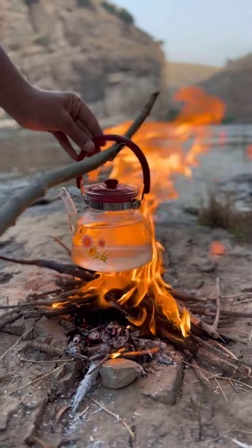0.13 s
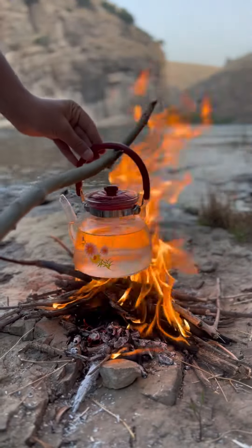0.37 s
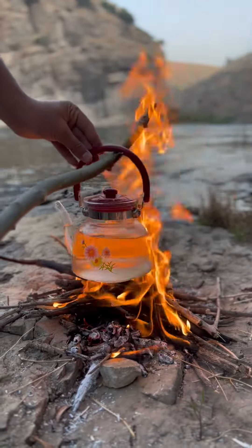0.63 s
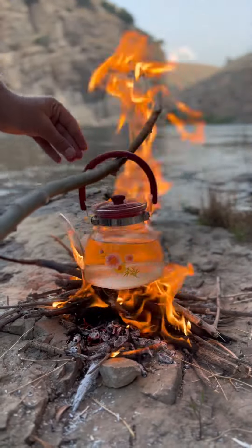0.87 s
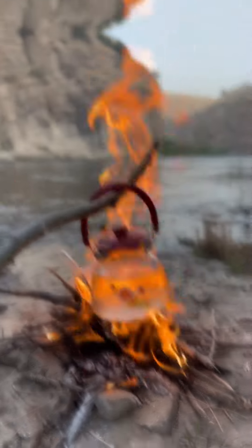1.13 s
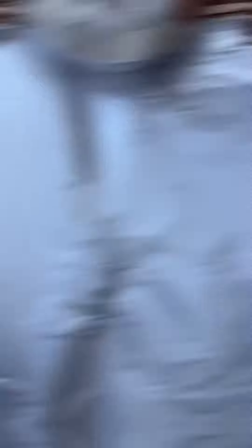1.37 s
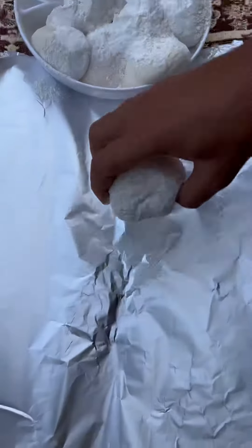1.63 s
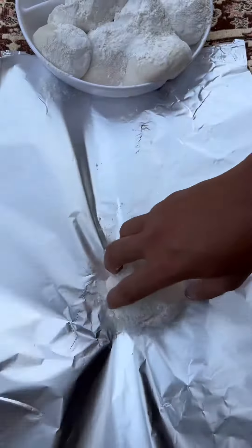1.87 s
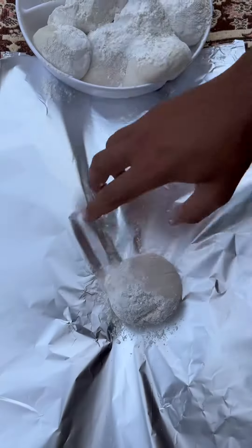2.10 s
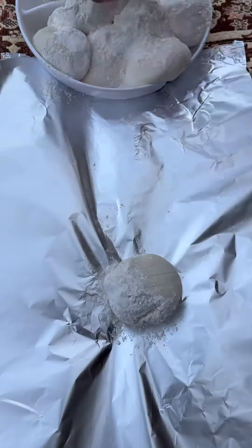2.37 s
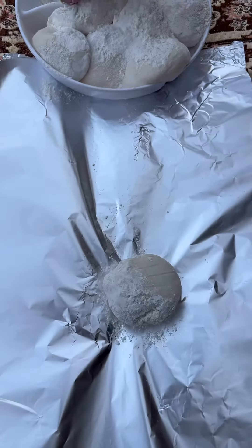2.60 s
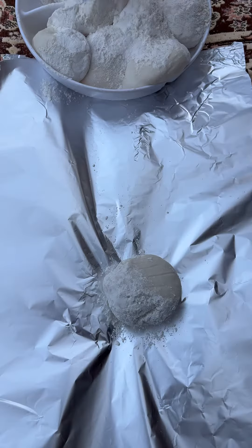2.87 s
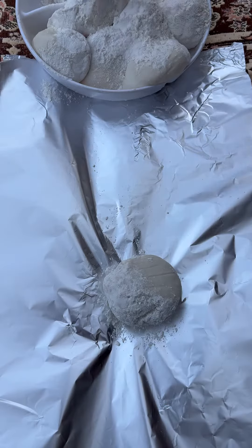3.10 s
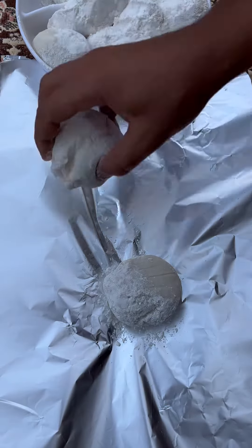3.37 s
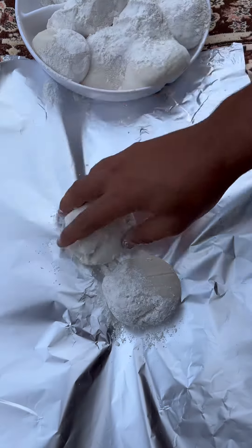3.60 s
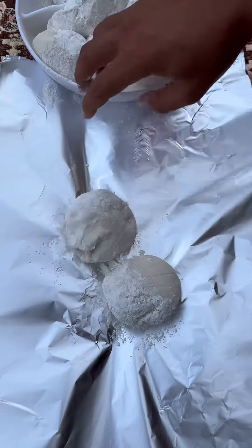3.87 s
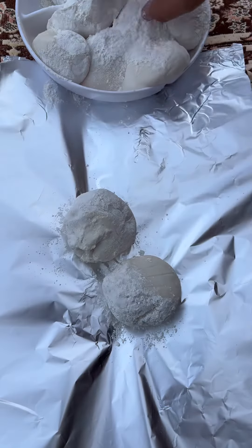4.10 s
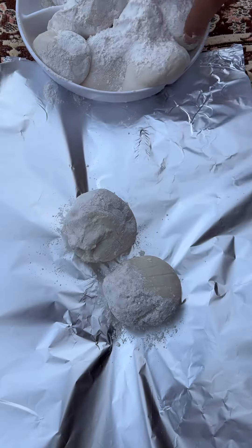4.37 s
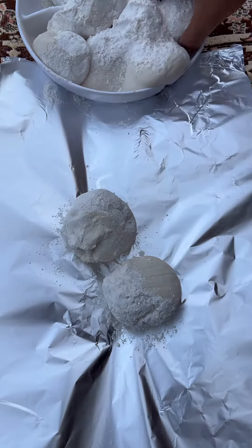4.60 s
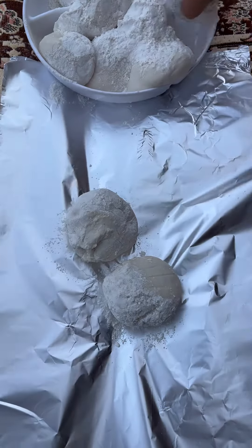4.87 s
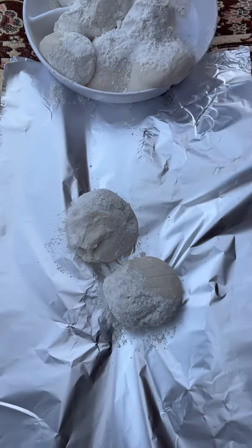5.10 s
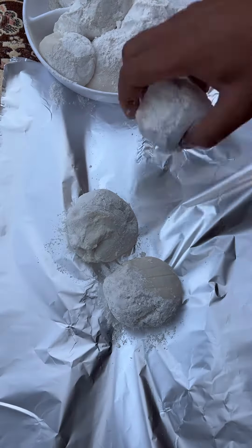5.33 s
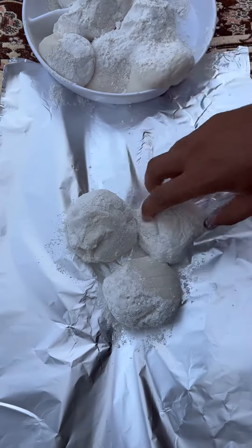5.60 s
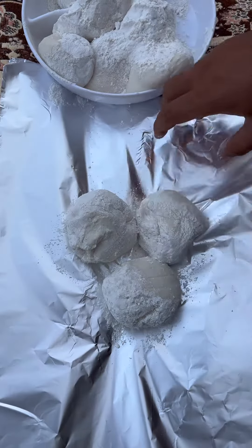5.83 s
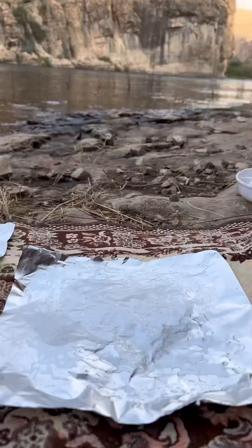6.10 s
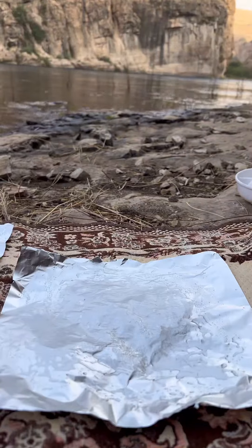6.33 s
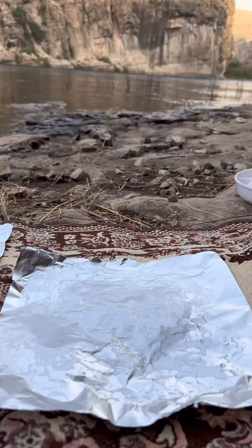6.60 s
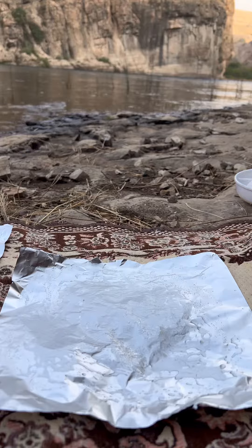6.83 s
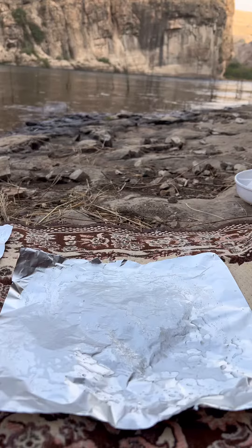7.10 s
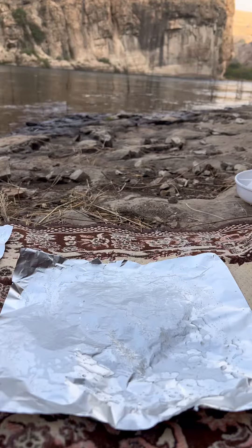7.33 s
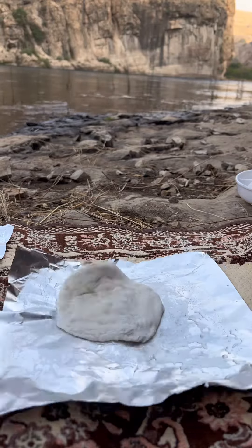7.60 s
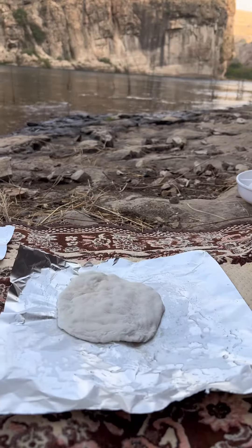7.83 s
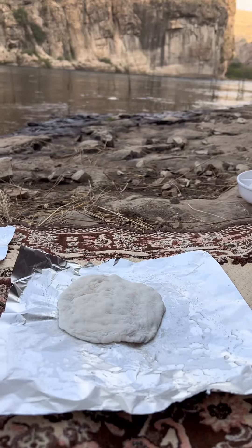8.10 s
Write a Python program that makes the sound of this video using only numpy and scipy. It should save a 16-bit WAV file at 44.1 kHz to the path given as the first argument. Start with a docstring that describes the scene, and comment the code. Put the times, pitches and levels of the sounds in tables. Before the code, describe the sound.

Outdoor river roar and fluttering flames with tiny pops, cutting to sharp foil crinkles under three dough balls and one final crisp foil crash.

```python
"""Outdoors by a river, three shots cut together: a twig fire, then balls of dough set down on a sheet of
aluminium foil, then a flat loaf dropped on the foil. The far river and air make a dull steady roar of
coloured noise; the fire adds rumble, noise hiss, and filtered clicks as ticks, sap pops and fizz.
Foil crashes and crinkles at each touch: showers of tiny snaps, ringing in the thin sheet. Each landing
adds a push of air, a thud and ringing panels. All is heard through two microphone ports."""
import sys
import numpy as np
from scipy import signal
from scipy.fft import rfft, irfft, next_fast_len
from scipy.io import wavfile

SR = 44100
rng = np.random.default_rng(int(sys.argv[2]) if len(sys.argv) > 2 else 0)


def int16_out(signal):
    """Quantize to a 16-bit WAV file."""
    q = np.round(np.clip(np.atleast_2d(signal).T, -1, 1) * 32767)
    wavfile.write(sys.argv[1], SR, q.astype(np.int16))


def voltage_ratio(decibels):
    """Convert decibels (scalar or array-like) to amplitude ratios, 20 dB per decade."""
    exponent = np.asarray(decibels, float) / 20
    return 10 ** exponent


N = 362061   # length in samples
STEP = 16   # samples per envelope point

# The three shots, with a short gap before the last: start_s, end_s
SHOT_TIMES = [(-1, 1.8122), (1.8122, 6.0972), (6.107, 9)]
# Width between the microphone ports, one table a shot: pitch_hz, difference_over_sum_db
PORT_WIDTH = [
    [(60, -27), (110, -32), (200, -21.5), (380, -22), (700, -4.5), (1290, -5.5), (2380, -5), (4400, -3),
     (8120, -1.5), (15000, 1)],
    [(60, -18), (110, -21.5), (200, -24.5), (380, -13), (700, -2), (1290, -3.5), (2380, -0.5), (4400, -1.5),
     (8120, -3), (15000, 0.5)],
    [(60, -19), (110, -28.5), (200, -16.5), (380, -13.5), (700, -1.5), (1290, -5), (2380, -3.5), (4400, -4),
     (8120, -9), (15000, -2)],
]
# Balance of the ports, one table a shot: pitch_hz, left_over_right_db
PORT_BALANCE = [
    [(60, 0.5), (180, 1.0), (550, 3), (1650, 1.5), (4970, 0.5), (15000, 0.0)],
    [(60, 1.0), (180, 1.5), (550, 2.0), (1650, 1.0), (4970, 1.0), (15000, 0.2)],
    [(60, -1.0), (180, -1.95), (550, -2.4), (1650, 1.6), (4970, -1.7), (15000, 0.0)],
]


def at_hz(points, hz):
    """Read a table on a log-frequency axis."""
    points = np.array(points)
    return np.interp(np.log(hz), np.log(points[:, 0]), points[:, 1])


def rms_one(x):
    """Scale to rms 1."""
    return x / np.sqrt(np.mean(x ** 2) + 1e-20)


def full_rate(coarse):
    """Join envelope points up to one value a sample."""
    return np.interp(np.arange(N) / STEP, np.arange(len(coarse)), coarse)


def drift(rate_hz):
    """Slow chance with rms 1: noise through two equal low-pass poles."""
    r = np.exp(-2 * np.pi * rate_hz * STEP / SR)
    noise = rng.standard_normal(N // STEP + 4002)
    slow = signal.lfilter([1], [1, -2 * r, r * r], noise)[4000:]   # the filter has settled
    return full_rate(rms_one(slow))


def two_ports(shared, own, side_db, balance_db, lagging, colour=None):
    """The ports differ by a part that is the same sound lagging on the left, and a part unrelated to it."""
    size = next_fast_len(N)
    hz = np.maximum(np.arange(size // 2 + 1) * SR / size, 1)
    gain = 1 if colour is None else voltage_ratio(at_hz(colour, hz))
    width = voltage_ratio(at_hz(side_db, hz))
    lagging = np.clip(lagging, 0, 1)
    mid = rfft(shared, size) * gain
    unrelated = np.sqrt(1 - lagging ** 2) * rfft(own, size) * gain
    late = -1j * lagging * mid   # a quarter cycle behind
    side = width * (unrelated + late)
    lean = voltage_ratio(at_hz(balance_db, hz) / 2)
    left = irfft((mid + side) * lean, size)[:N]
    right = irfft((mid - side) / lean, size)[:N]
    return np.array([left, right])


def ring(clicks, hz, t60_s):
    """A two-pole resonator: a unit click sets a dying sine of height 1 ringing."""
    r, w = voltage_ratio(-60 / (t60_s * SR)), 2 * np.pi * hz / SR
    return signal.lfilter([0, np.sin(w)], [1, -2 * r * np.cos(w), r * r], clicks + 1e-18)


def roar():
    """Smooth noise with the colour of each shot; bass and treble waver, most of all near the flames."""
    # Spectrum of the roar by the fire, near the foil and by the river: pitch_hz, level_db_per_hz
    fire_colour = [(15, -43), (25, -18.5), (42, -6.5), (59, -2), (180, -4), (394, -6.5), (427, -7),
                   (840, -17.5), (936, -22), (2050, -31), (3500, -40.5), (5000, -48), (8140, -46.5),
                   (12200, -65), (16000, -53.5)]
    near_foil_colour = [(15, -72.5), (25, -39.5), (63, -12), (134, -3), (243, -7), (291, -4.5), (475, -9),
                        (513, -12), (600, -13), (756, -15.5), (883, -20.5), (1500, -31.5), (2820, -36.5),
                        (5120, -47), (5820, -50), (12000, -68.5), (15600, -97), (22000, -120)]
    river_colour = [(15, -40), (25, -33), (47, -15), (145, -2), (277, -5.5), (309, -6.5), (344, -4),
                    (405, -2), (911, -16), (1230, -20), (2280, -28.5), (5280, -45.5), (6740, -57.5),
                    (16000, -69)]
    # Level in each shot before the wavering: start_db, end_db
    shot_levels = [(-42, -37.5), (-43.5, -42.5), (-40, -40.5)]
    flutter_db, flutter_below_hz = [2.5, .6, .6], 200   # rms swing of the bass, per shot
    flicker_db, flicker_above_hz = [1.5, .8, .8], 2000   # rms swing of the treble, per shot
    fade_s = .003   # each shot's roar fades in and is cut off hard
    lagging = 0.43
    bass_band = signal.butter(2, flutter_below_hz, fs=SR, output="sos")
    treble_band = signal.butter(2, flicker_above_hz, "high", fs=SR, output="sos")
    t, out = np.arange(N) / SR, np.zeros((2, N))
    for k, colour in enumerate([fire_colour, near_foil_colour, river_colour]):
        noise = rng.standard_normal((2, N))
        pair = rms_one(two_ports(*noise, PORT_WIDTH[k], PORT_BALANCE[k], lagging, colour))
        bass = signal.sosfiltfilt(bass_band, pair)
        treble = signal.sosfiltfilt(treble_band, pair)
        pair = pair + bass * (voltage_ratio(flutter_db[k] * drift(3.6)) - 1)
        pair = pair + treble * (voltage_ratio(flicker_db[k] * drift(14.0)) - 1)
        start_s, end_s = SHOT_TIMES[k]
        shown = np.clip((t - start_s) / fade_s, 0, 1) * (t < end_s)
        out += shown * voltage_ratio(np.interp(t, SHOT_TIMES[k], shot_levels[k])) * pair
    return out


def fizz():
    """Faint crackle of the embers: sparse tiny clicks of uneven size while the fire is near."""
    clicks_per_s, least_db = 30., -54   # click size ahead of the band-pass
    size_db = least_db + 3.3 * np.minimum(rng.exponential(1, N), 3)
    sizes = voltage_ratio(size_db) * rng.choice([-1, 1], N)
    near_fire = np.arange(N) / SR < SHOT_TIMES[0][1]
    born = (rng.random(N) < clicks_per_s / SR) * near_fire
    band = signal.butter(2, [4800, 12000], "band", fs=SR, output="sos")
    return signal.sosfilt(band, sizes * born + 1e-18)


def pops():
    """Each sap pop in the twigs is a short pitched ring, struck by a very short pulse."""
    # Sap pops: start_s, nominal peak_db, pitch_hz
    sap_pops = [(0.0667, -53, 2160), (0.4419, -47.5, 2650), (1.2461, -54.5, 1930), (1.3468, -47.5, 2290)]
    out = np.zeros(N)
    for s, db, hz in sap_pops:
        click = np.zeros(round(.05 * SR))
        click[:6] = voltage_ratio(db) / 4
        at = round(s * SR)
        out[at:at + len(click)] += ring(click, hz, t60_s=0.02)
    return out


def ticks():
    """Each twig tick is a click ringing for a few cycles: a dying noise burst in a band around its pitch."""
    # Twig ticks: start_s, peak_db (ahead of the two ports), pitch_hz
    twig_ticks = [(0.4823, -45, 9500), (0.5665, -53, 10100), (0.73, -51, 9390), (0.8131, -51, 8400),
                  (0.8345, -53, 8000), (0.9288, -54, 9000), (0.9498, -45.5, 6300), (0.9857, -52, 9500),
                  (1.1, -43, 8600), (1.2246, -49, 8230), (1.3867, -59, 11000)]
    out, t = np.zeros(N), np.arange(round(.02 * SR)) / SR
    noises = rng.standard_normal((len(twig_ticks), len(t)))
    for (s, db, hz), noise in zip(twig_ticks, noises):
        burst = noise * voltage_ratio(-60 * t / 0.013)   # t60 13 ms
        band_hz = [hz / 1.36, min(hz * 1.18, .45 * SR)]
        burst = signal.lfilter(*signal.butter(2, band_hz, "band", fs=SR), burst)
        at = round(s * SR)
        out[at:at + len(t)] += voltage_ratio(db) * burst / np.abs(burst).max()
    return out


def snaps():
    """Tiny creases snapping through: two unrelated streams of clicks at random times, sizes and signs."""
    snaps_per_s, spread_db = 9000., 3
    size_db = spread_db * np.minimum(rng.exponential(1, (2, N)), 4)
    sizes = voltage_ratio(size_db) * rng.choice([-1, 1], (2, N))
    return rms_one(sizes * (rng.random((2, N)) < snaps_per_s / SR))


def crackle_power(centres):
    """Power of the crackle per band over time, and its left-right dB: crushes, buckles and stirs added up."""
    # How hard the foil is crushed, one curve for each touch: time_s, crackle_db
    crush_curves = [
        [(1.49, -72), (1.55, -61), (1.65, -60), (1.7, -55.5), (1.82, -57)],
        [(1.826, -42), (1.831, -25.5), (1.838, -17), (1.872, -19.5), (1.906, -30), (1.972, -34.5), (2.002, -45),
         (2.044, -47), (2.1, -58)],
        [(3.4655, -29.5), (3.471, -22.5), (3.477, -16.5), (3.497, -26), (3.524, -25), (3.565, -35),
         (3.585, -34), (3.62, -45)],
        [(3.622, -33), (3.635, -32.5), (3.649, -33), (3.677, -48), (3.76, -75)],
        [(4.643, -57), (4.65, -36), (4.704, -41.5), (4.734, -28.5), (4.784, -36), (4.808, -27.5), (4.868, -44),
         (4.94, -46), (5.0, -63)],
        [(5.39, -67), (5.408, -54), (5.414, -39.5), (5.437, -39.5)],
        [(5.4375, -21), (5.446, -22), (5.456, -25), (5.51, -29), (5.546, -45.5), (5.6, -54), (5.64, -52)],
        [(7.542, -17), (7.562, -15.5), (7.596, -33), (7.618, -29), (7.66, -39), (7.71, -59)],
    ]
    # For those touches: brightness_db_per_octave, left_over_right_db
    touch_tones = [(-1, 0), (2.5, 0), (1.5, -0.5), (4.5, 0), (3, 0), (-0.5, 0), (3, -0.5), (2.5, -1)]
    # Single creases flip over: start_s, nominal peak_db, t60_s (at 5 kHz), brightness_db_per_octave
    buckles = [(1.536, -53, .1, -7), (1.551, -46.5, 0.077, -1), (1.581, -25, 0.054, -1.5),
               (1.663, -27, .11, 1), (1.715, -39, 0.04, 1), (1.797, -36, 0.069, -10), (1.955, -26, 0.11, 4),
               (2.033, -34.5, 0.18, -2.5), (2.1054, -33, 0.029, -7.5), (2.127, -63.5, 0.082, 15),
               (2.5258, -45, .05, -6), (3.4177, -32.5, 0.038, -2.5), (3.642, -29.5, 0.071, 1.5),
               (3.979, -53, .03, -7), (4.712, -31, 0.086, 1.5), (4.913, -35, 0.14, -2),
               (5.008, -35.5, 0.095, 0), (5.116, -59, .03, -1), (5.182, -56, .03, 6),
               (5.436, -9, 0.096, -2.5), (5.561, -32.5, 0.103, -4), (5.587, -27, .05, 0.5),
               (5.604, -31.5, 0.1, 2), (5.647, -27, 0.065, 1.5), (5.806, -42.5, 0.053, -0.5),
               (6.004, -49, 0.068, -7), (7.315, -58.5, .03, 0), (7.435, -60, .03, 4),
               (7.716, -40.5, .05, 4.5), (7.838, -52.5, .04, 6), (7.931, -41, .045, -1.5)]
    # The loose sheet stirs faintly: middle_s, level_db, half_length_s, brightness_db_per_octave
    stirs = [(2.534, -81, 0.054, -3), (2.773, -73, 0.074, -4), (4.126, -70, 0.036, 2.5),
             (4.33, -71, 0.041, -8.5), (4.52, -75, 0.052, -7.5), (3.44, -56.5, .02, -3),
             (5.69, -74, 0.027, -14), (6.572, -78, 0.037, 0.5), (7.26, -70.5, 0.031, -5),
             (7.774, -71.5, 0.062, -3)]
    body_below_hz = 1700   # below this the whole sheet moves and brightness changes nothing more
    dulls_per_db, firm_db = 0.0945, -24.5   # dB per octave lost for each dB under a firm crush
    crest_db = 9   # peaks of a crinkle above its rms
    attack_s = 0.00036
    treble_damping = 0.11   # t60 shrinks as this power of pitch
    after_db, after_t60_s = -17.5, .3   # the sheet settles after each buckle

    t = np.arange(N // STEP + 2) * STEP / SR
    octaves = np.log2(np.maximum(centres, body_below_hz) / 5000)[:, None]
    power, pan_db = np.zeros((len(centres), len(t))), np.zeros(len(t))
    for curve, (tilt_db, lean_db) in zip(crush_curves, touch_tones):
        s, db = np.transpose(curve)
        on = (t >= s[0]) & (t < s[-1])
        level_db = np.interp(t[on], s, db)
        brightness_db = tilt_db + dulls_per_db * (level_db - firm_db)
        power[:, on] += voltage_ratio(level_db + octaves * brightness_db) ** 2
        pan_db[t >= s[0]] = lean_db
    damping = (centres[:, None] / 5000) ** treble_damping
    for s, db, t60, tilt_db in buckles:
        on = (t >= s) & (t < s + .5)
        age = t[on] - s
        flip = voltage_ratio(-120 * age * damping / max(t60, .01))   # 120, as this is power
        settling = voltage_ratio(2 * after_db - 120 * age * damping / after_t60_s)
        attack = voltage_ratio(db - crest_db + tilt_db * octaves) * (1 - np.exp(-age / attack_s))
        power[:, on] += attack ** 2 * (flip + settling)
    for s, db, half_s, tilt_db in stirs:
        swell = np.exp(-((t - s) / half_s) ** 2)
        power += voltage_ratio(db + tilt_db * octaves) ** 2 * swell
    return power, pan_db


def sheet(x):
    """Each snap rings on in many close modes (a click, then dying noise) that change as the sheet bends."""
    shape_lasts = 1024   # samples until the sheet has taken a new shape
    tail_db, t60_s = -9.5, 0.022   # tail energy relative to the click
    count = N // shape_lasts + 1
    t = np.arange(shape_lasts) / SR
    tails = rng.standard_normal((count, shape_lasts)) * voltage_ratio(-60 * t / t60_s)
    replies = voltage_ratio(tail_db) * tails / np.sqrt(np.sum(tails ** 2, axis=1, keepdims=True))
    replies[:, 0] = 1   # the click itself
    blocks = np.pad(x, ((0, 0), (0, count * shape_lasts - N))).reshape(2, count, -1)
    rung = irfft(rfft(blocks, 2 * shape_lasts) * rfft(replies, 2 * shape_lasts))
    heads = rung[:, :, :shape_lasts]
    ends = np.roll(rung[:, :, shape_lasts:], 1, axis=1)   # ring over into the next block
    return (heads + ends).reshape(2, -1)[:, :N] / np.hypot(1, voltage_ratio(tail_db))


def foil(patchy_db, surge_db):
    """Crushed foil gives a shower of snaps, coloured band by band, ringing in the thin sheet."""
    # Spectrum of the crackle: pitch_hz, level_db_per_hz
    crackle_colour = [(290, -38), (500, -8.5), (819, -7.5), (1620, -3.5), (2650, 1), (4870, -5.5),
                      (5710, 1), (7100, -1.5), (10500, -5.5), (12000, -15), (15100, -12), (16000, -11.5)]
    # Width between the ports, miked from above, then from the front: pitch_hz, difference_over_sum_db
    foil_width = [
        [(60, -18), (99, -14.5), (160, -17.5), (270, -12.5), (450, -5.5), (740, -5), (1220, -8.5), (2010, -17),
         (3330, -0.5), (5500, -3), (9080, -2.5), (15000, 1.5)],
        [(60, -12), (99, -12), (160, -18), (270, -13.5), (450, -1.5), (740, -3.5), (1220, 2), (2010, -3.5),
         (3330, -10.5), (5500, -3.5), (9080, -8), (15000, 0)],
    ]
    # Balance of the ports: pitch_hz, left_over_right_db
    foil_balance = [(60, 1), (180, 3.5), (550, 7), (1650, 0.5), (4970, 1), (15000, -0.5)]
    lagging = .7
    edges = 280 * 2 ** (np.arange(19) / 3)   # third-octave bands, Hz
    centres = np.sqrt(edges[1:] * edges[:-1])
    share = voltage_ratio(at_hz(crackle_colour, centres)) ** 2
    share = share / np.sum(share * np.diff(edges) / (SR / 2))
    power, pan_db = crackle_power(centres)
    out, showers = np.zeros((2, N)), [snaps(), snaps()]   # neighbouring bands get unrelated snaps
    surge = surge_db * drift(150.)   # the snaps come in clumps
    for k, (low, high) in enumerate(zip(edges, edges[1:])):
        patchy = patchy_db * drift(40.)   # each band wavers by itself
        gain = full_rate(np.sqrt(share[k] * power[k])) * voltage_ratio(surge + patchy)
        band = signal.butter(2, [low, high], "band", fs=SR, output="sos")
        out += signal.sosfilt(band, gain * showers[k % 2] + 1e-18)
    pan_db = full_rate(pan_db)
    rung = sheet(out)
    last_shot = np.arange(N) / SR >= SHOT_TIMES[2][0]
    above, front = [two_ports(*rung, side_db, foil_balance, lagging) for side_db in foil_width]
    return np.where(last_shot, front, above) * voltage_ratio([pan_db / 2, -pan_db / 2])


def landings():
    """Soft dough pushes out air, thuds on the ground and rattles the flat panels of the foil."""
    # Dough lands: start_s, air_push_db, thud_db (ahead of its envelope), rattle_db (drives the panels),
    # contact_ms (decay time constant of the rattle)
    dough_landings = [(1.834, -63, -40, -57.5, 25), (3.474, -46, -37, -48.5, 5.4),
                      (5.438, -56.5, -19.5, -50, 4), (7.543, -53.5, -37, -45, 13.3)]
    # Ringing panels of the foil: pitch_hz, gain_db, t60_s
    panel_modes = [(450, -16, 0.025), (678.6, -17, 0.0037), (865, -16.5, 0.018), (1143, 4, .025),
                   (1330, 9, 0.019), (2600, 2.5, 0.028), (2860, -2.5, 0.038), (5670, -0.5, 0.069),
                   (5620, 0.5, .04)]
    push_hz, thud_hz = 35.8, 260
    thud_rise_s, thud_t60_s = 0.0071, 0.046
    out, t = np.zeros(N), np.arange(round(.3 * SR)) / SR
    noises = rng.standard_normal((len(dough_landings), len(t)))
    thud_shape = (1 - np.exp(-t / thud_rise_s)) * voltage_ratio(-60 * t / thud_t60_s)
    for (s, push_db, thud_db, rattle_db, contact_ms), noise in zip(dough_landings, noises):
        push = voltage_ratio(push_db) * np.sin(2 * np.pi * push_hz * t) * (t < 1 / push_hz)   # one cycle
        thud = voltage_ratio(thud_db) * np.sin(2 * np.pi * thud_hz * t) * thud_shape
        rattle = voltage_ratio(rattle_db) * noise * np.exp(-t / (contact_ms / 1000))
        rings = sum(voltage_ratio(db) * ring(rattle, hz, t60) for hz, db, t60 in panel_modes)
        at = round(s * SR)
        out[at:at + len(t)] += push + thud + rings
    return out


def scene():
    """Roar, the sounds of burning twigs, landings and foil; the landings are equal in both ports."""
    twigs = fizz() + pops() + ticks()
    twigs = two_ports(twigs, 0 * twigs, PORT_WIDTH[0], PORT_BALANCE[0], lagging=0.9)
    return roar() + twigs + foil(patchy_db=0.33, surge_db=0.5) + landings()


def low_pass(x):
    """Removes everything above the highest recorded frequency."""
    return signal.sosfilt(signal.butter(12, 16820, fs=SR, output="sos"), x)


def record(dry):
    """The microphone path ends at 16.4 kHz: a steep low-pass, 40 dB down from there."""
    cut = signal.sosfilt(signal.cheby2(12, 40, 16400, fs=SR, output="sos"), dry)
    return low_pass(cut)


dry = scene()
out = record(dry)
int16_out(out)
```